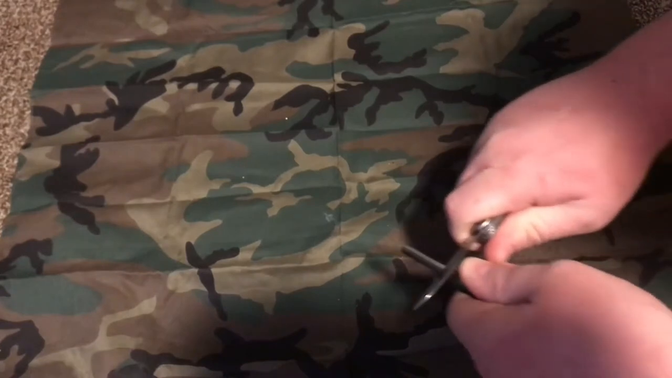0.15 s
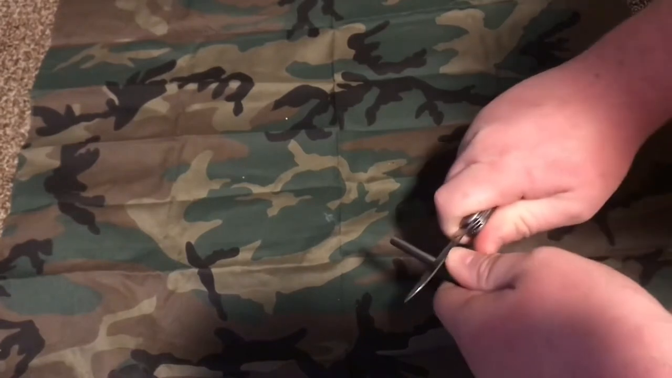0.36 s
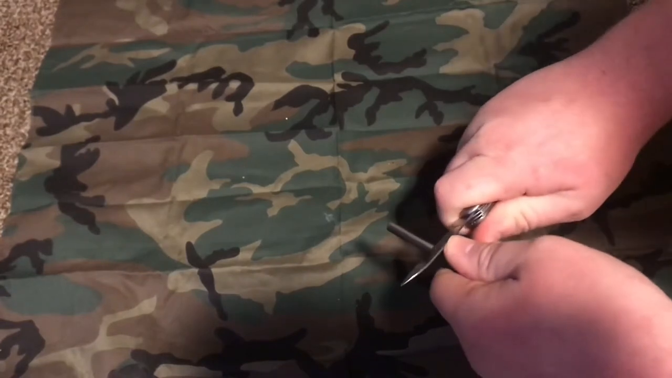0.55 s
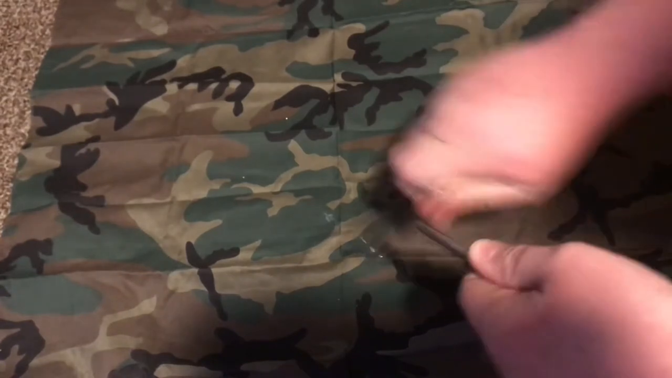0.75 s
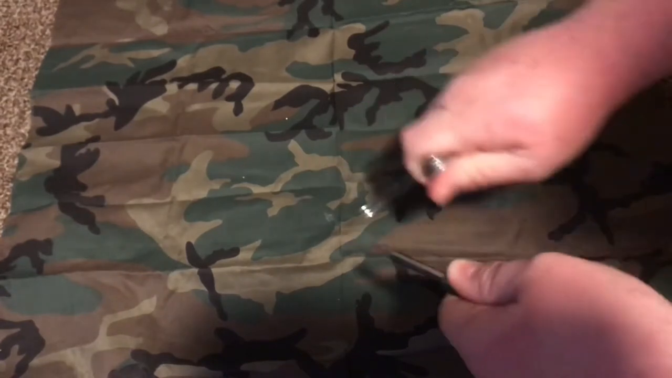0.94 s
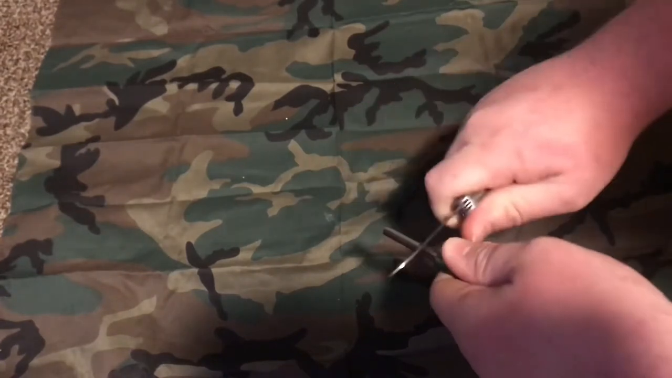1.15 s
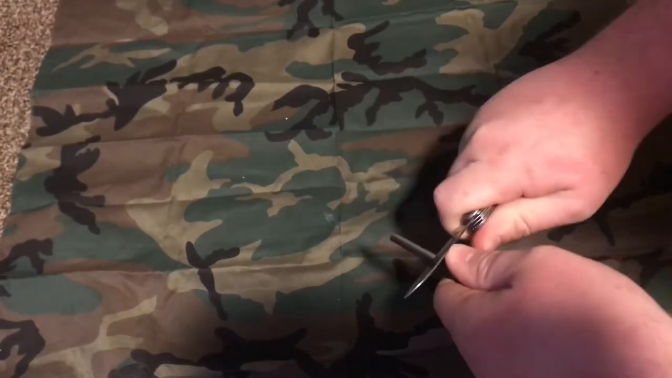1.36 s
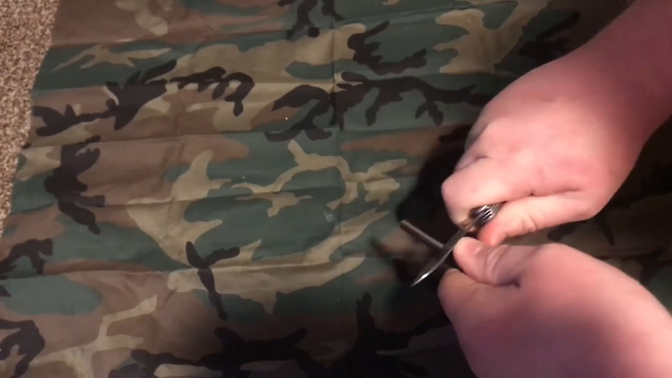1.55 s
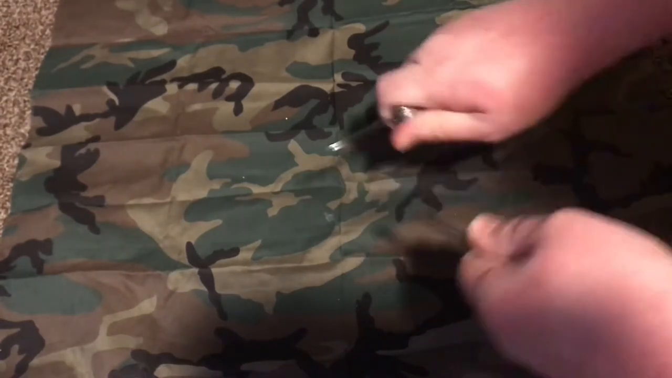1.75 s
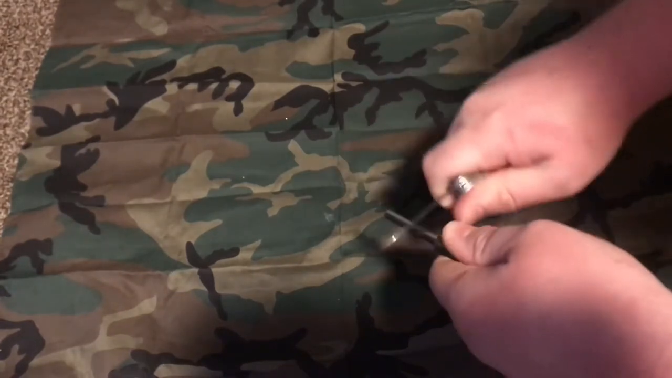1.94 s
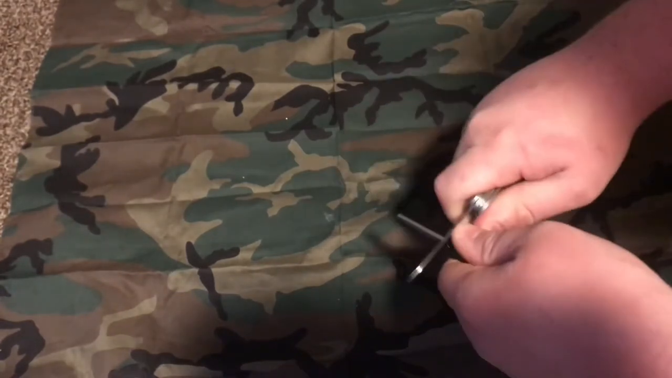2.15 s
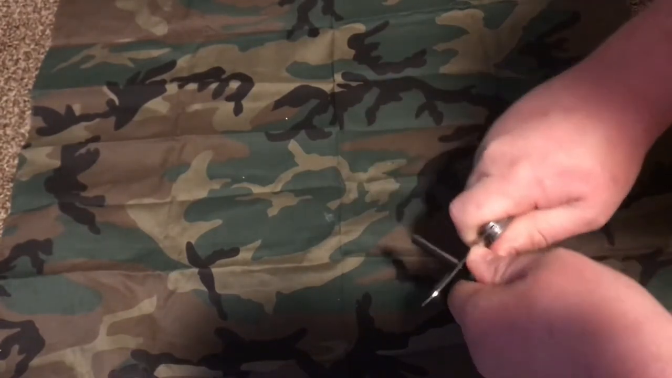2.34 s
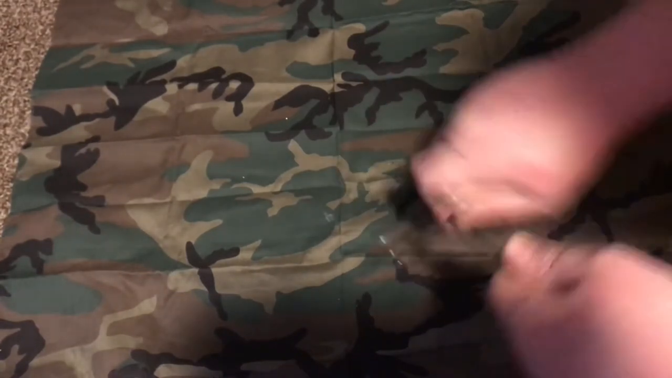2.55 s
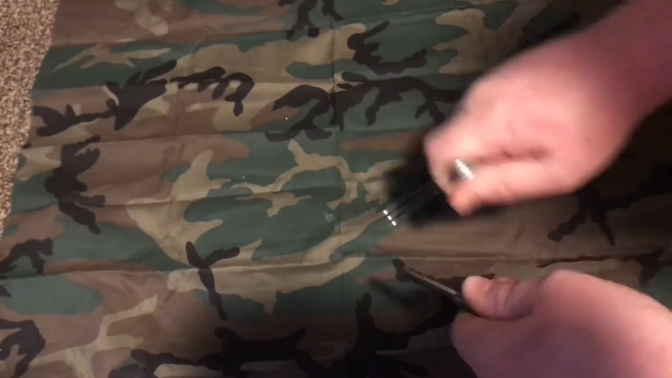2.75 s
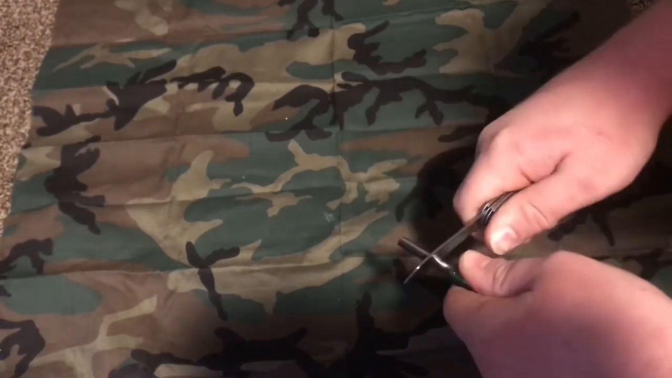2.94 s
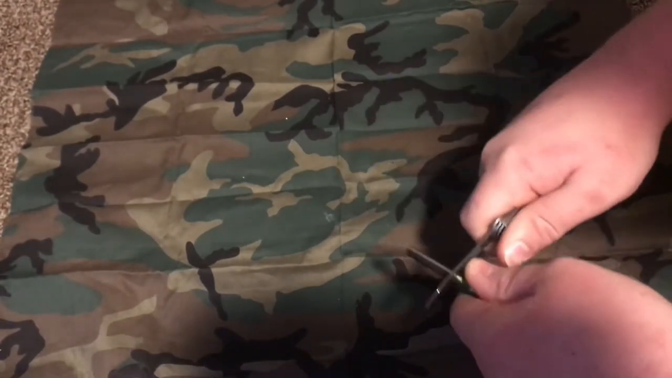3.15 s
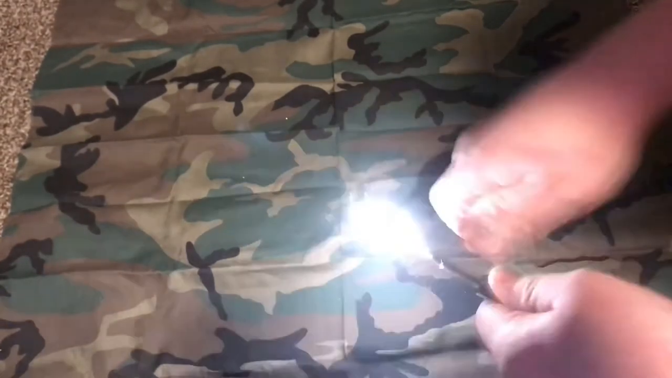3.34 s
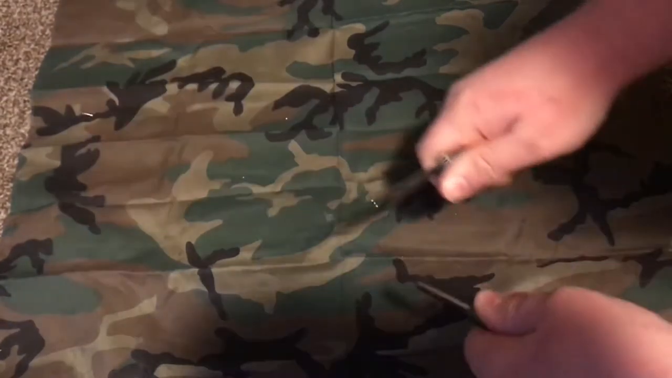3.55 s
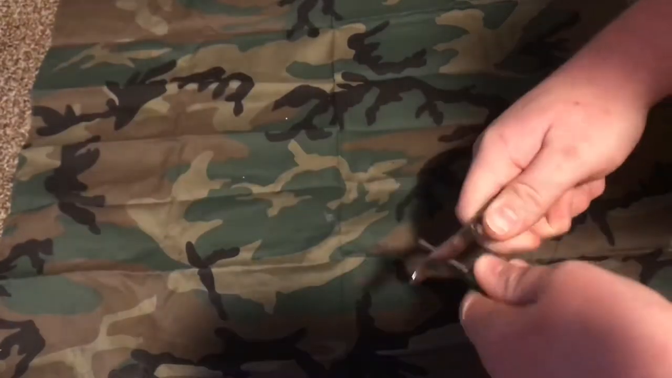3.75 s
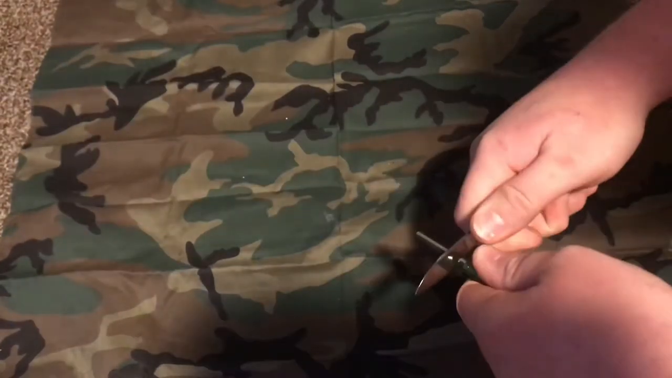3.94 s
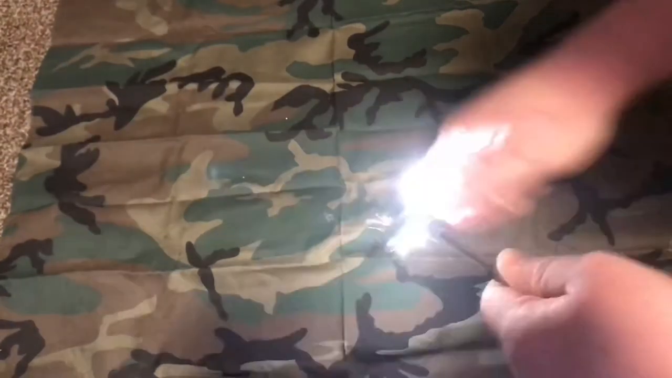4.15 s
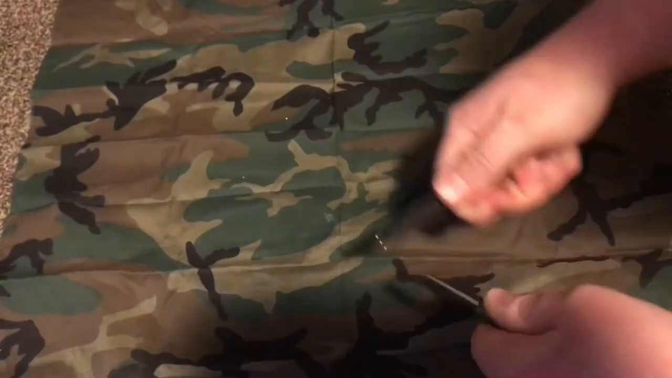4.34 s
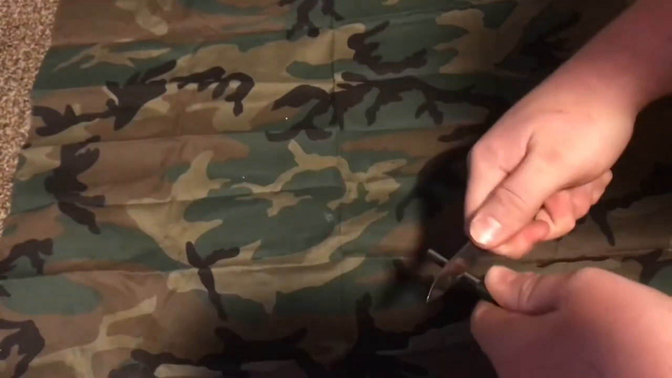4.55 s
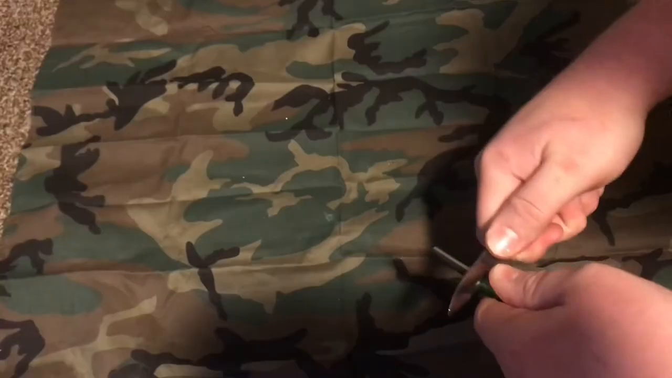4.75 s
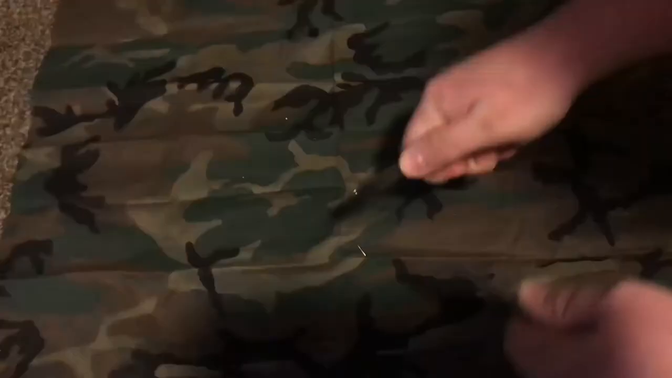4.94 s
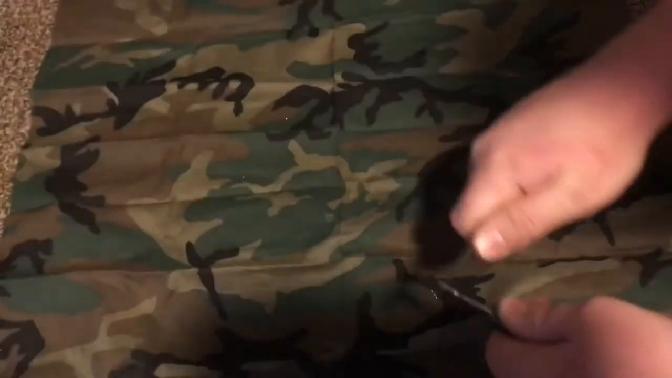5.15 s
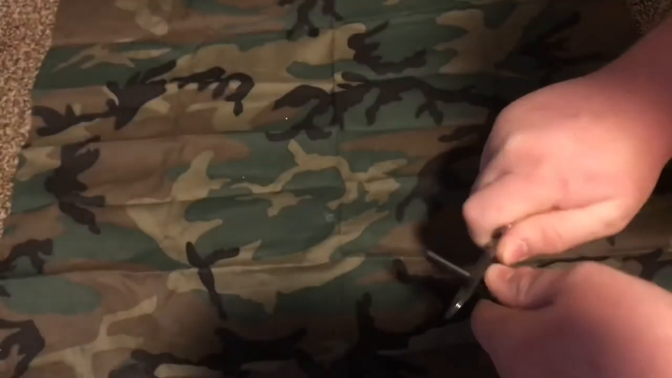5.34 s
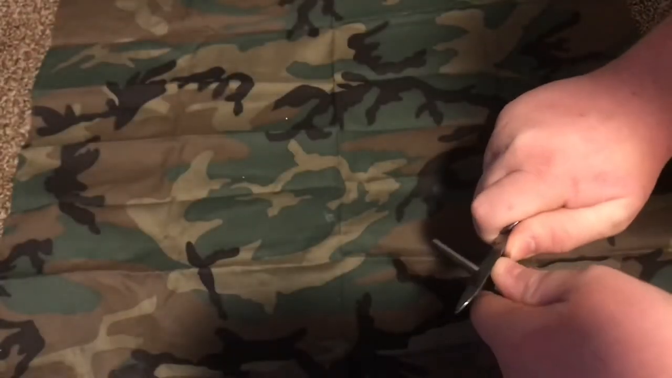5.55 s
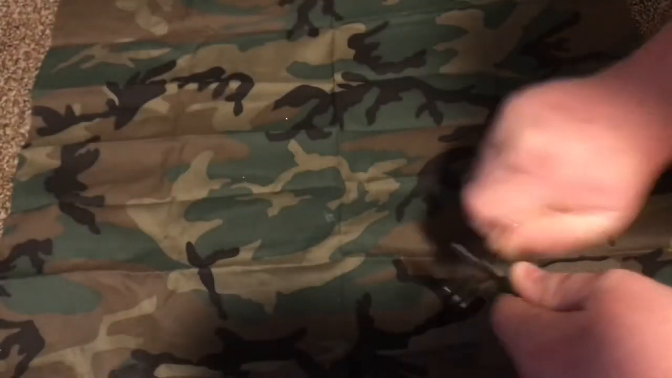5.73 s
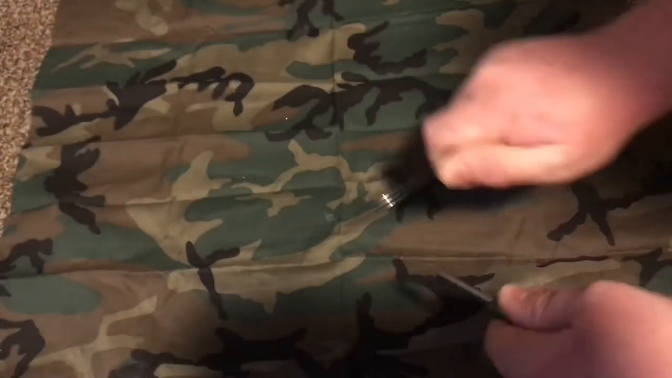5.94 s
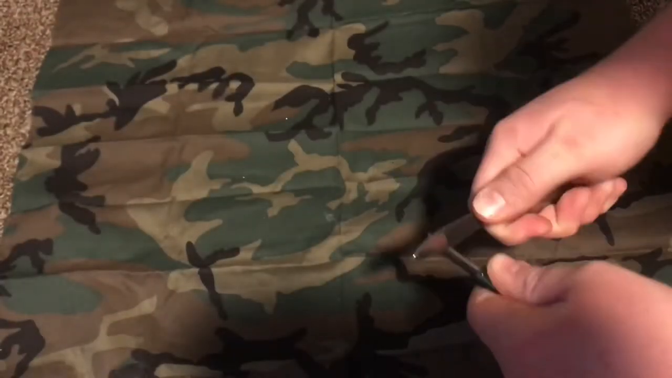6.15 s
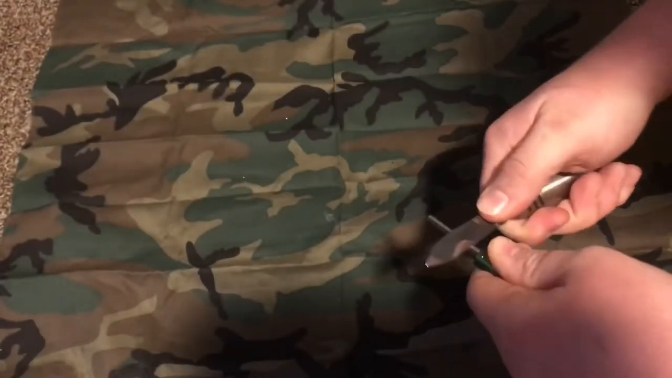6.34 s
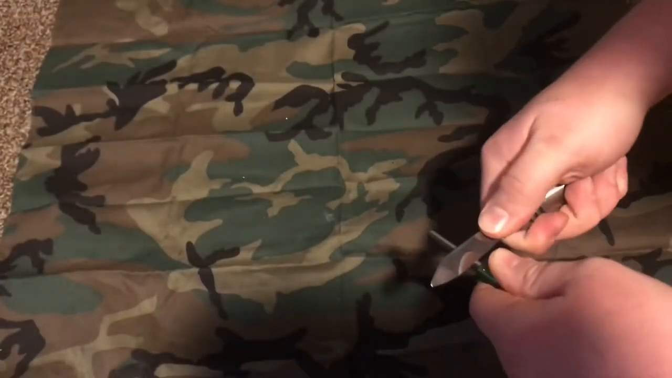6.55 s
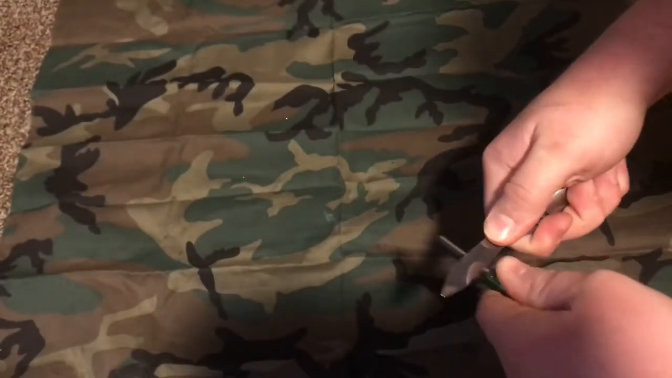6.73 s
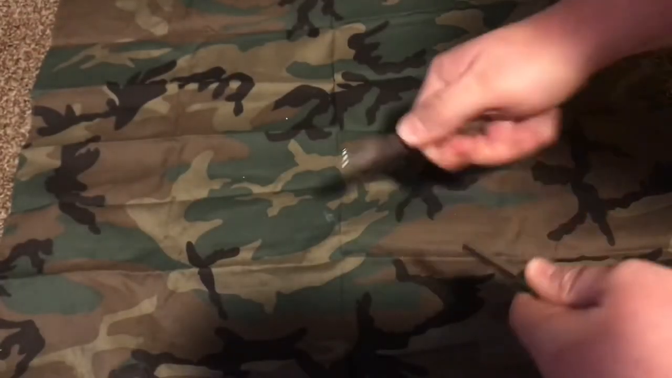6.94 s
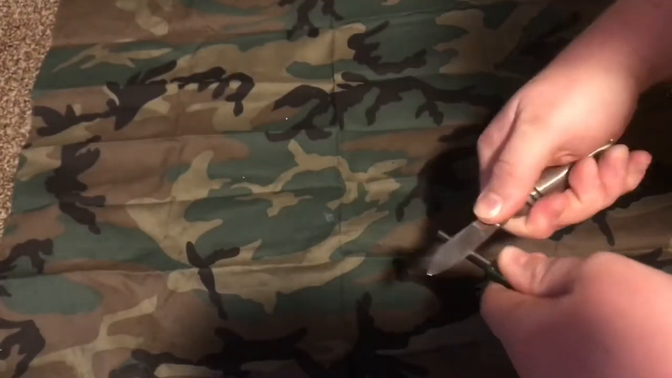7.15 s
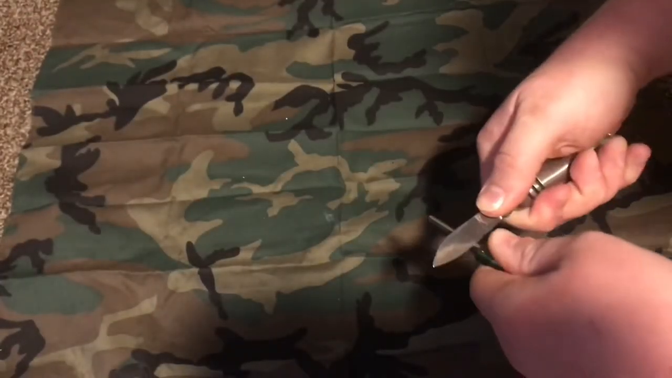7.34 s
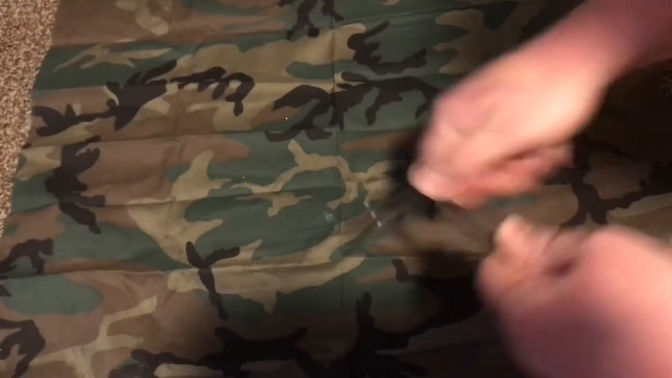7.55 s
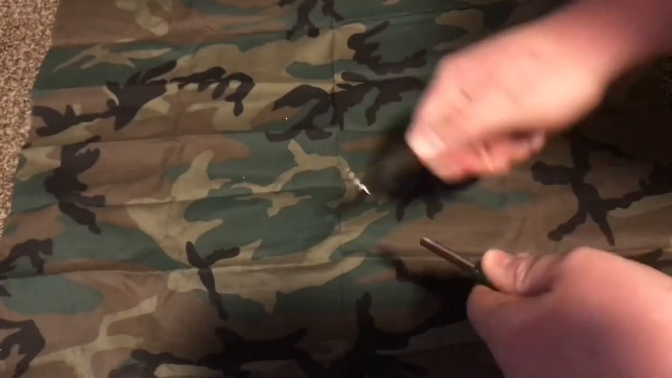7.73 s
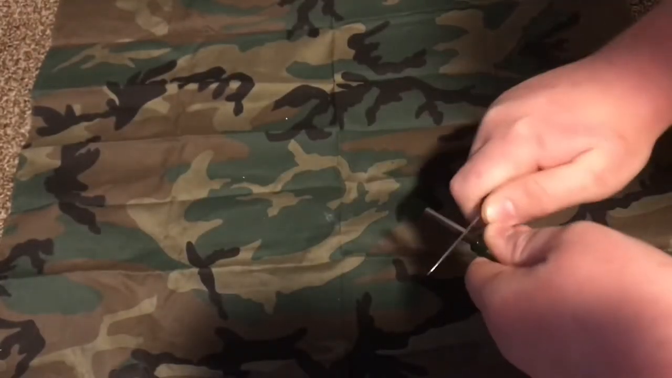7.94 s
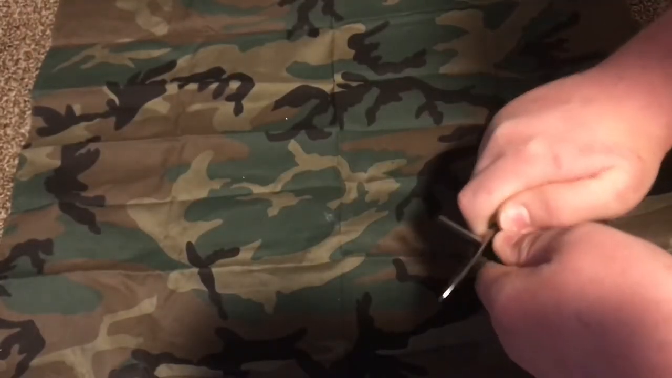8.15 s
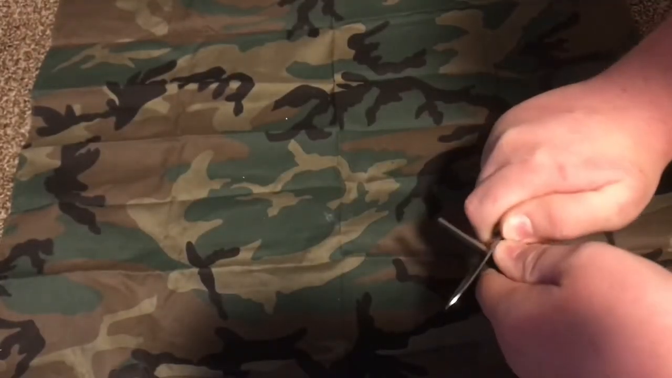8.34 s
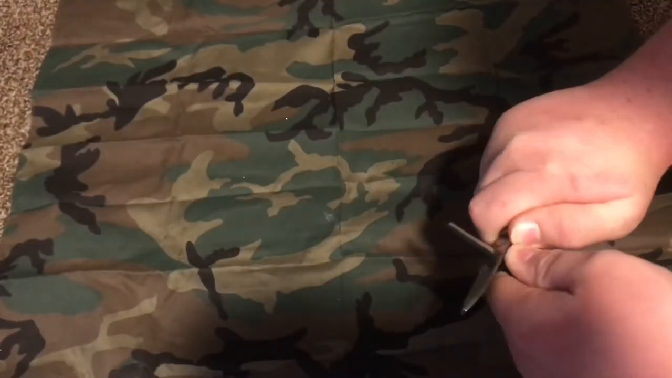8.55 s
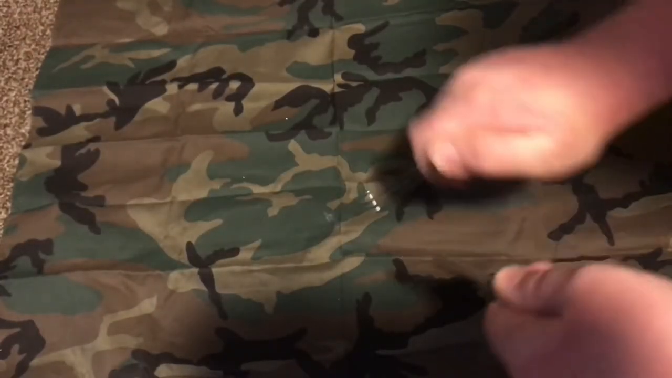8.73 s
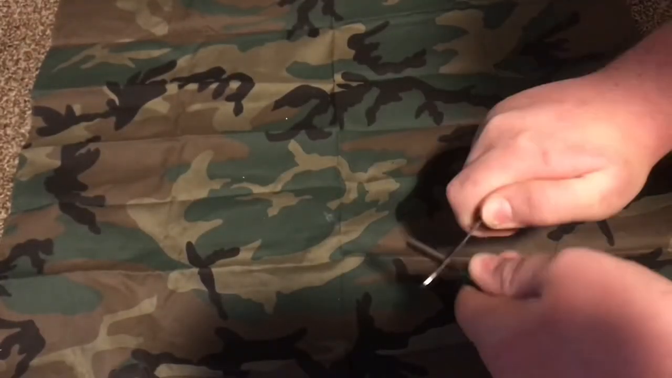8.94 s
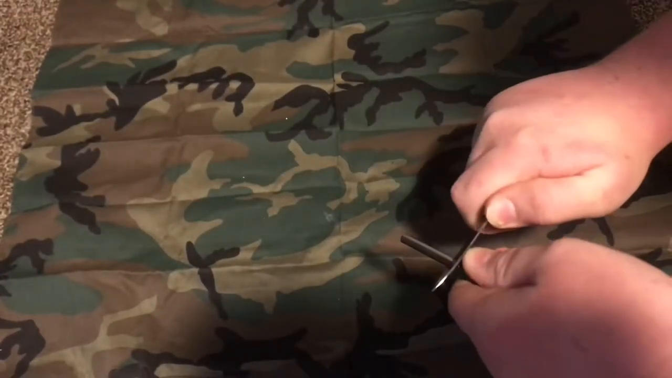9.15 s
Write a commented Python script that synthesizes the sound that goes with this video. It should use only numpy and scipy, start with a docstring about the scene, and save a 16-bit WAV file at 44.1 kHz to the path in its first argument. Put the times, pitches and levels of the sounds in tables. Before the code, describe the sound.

Ten quick, dry metallic rasps of a knife on a fire-starting rod, heard close up with a short room echo. Three softer strokes come first, then three sharp, loud ones, then four moderate to softer ones. Light landing ticks, brief skids and gritty rubs fill the gaps, and tiny flares puff and crackle after each stroke. The quiet room has low rumble, soft hiss, a faint drone and a thin electrical whine.

```python
"""A small quiet room: a knife is scraped ten times along a ferro rod, close to the microphone, over a cloth.
The edge bites in short rasps, dense fractures bunched by chatter, and snaps off the rod's end.
Around the strokes the blade lands with ticks, skids on and slides softly; shavings flare with a puff and a crackle.
Noisy contact forces pass through the resonances of blade and rod, which shift with the grip and the point of contact.
Behind them lie a short room echo, rumble and hiss, a low drone and a thin whine."""
import sys
import numpy as np
from scipy import signal
from scipy.fft import rfft, irfft
from scipy.io import wavfile

SR = 44100
rng = np.random.default_rng(int(sys.argv[2]) if len(sys.argv) > 2 else 0)


def to_wav(sig):
    """Store sig (one row per channel, or 1-D mono) as 16-bit WAV at the path in sys.argv[1].

    Samples outside -1..1 are clipped; the rate is SR.
    """
    pcm = np.clip(np.atleast_2d(sig), -1, 1) * 32767
    pcm = np.round(pcm).astype(np.int16)
    wavfile.write(sys.argv[1], SR, pcm.T)  # frames by channels


N = 409688
TIME = np.arange(N) / SR  # s
FILTER_HZ = np.maximum(np.fft.rfftfreq(2048, 1 / SR), 1)


def from_db(db):
    """Decibels to gain."""
    return 10 ** (np.asarray(db) / 20)


def rms_one(x):
    """Scale to an rms of 1."""
    return x / np.sqrt(np.mean(x ** 2) + 1e-20)


def at_hz(points, hz, axis=1):
    """Read one column of a table along log frequency."""
    points = np.array(points)
    return np.interp(np.log(np.maximum(hz, 1)), np.log(points[:, 0]), points[:, axis])


def add(track, start_s, sound):
    """Mix a sound into the track."""
    i = max(int(round(start_s * SR)), 0)
    track[i:i + len(sound)] += sound[:N - i]


def bell(hz, centre_hz, width_hz):
    """Shape of a resonance, 1 on top and one half at the edges of its width."""
    return 1 / (1 + (2 * (hz - centre_hz) / width_hz) ** 2)


def background():
    """Soft rumble and hiss, a low drone and a thin whine: shaped noise and steady sines."""
    # still room, spectrum shape: hz, density_db (relative, per Hz)
    still_room = [(15, -36), (25, -12.5), (59, -4), (111, -15), (180, -13.5), (200, -18.5), (427, -21),
                  (734, -31), (962, -28.5), (1740, -31.5), (3080, -34), (3520, -33), (4140, -34.5),
                  (9000, -39), (14400, -39), (16000, -44)]
    # low drone in the room: centre_hz, width_hz, level_db
    drone = [(54, 11, -70), (138.3, 4.4, -71.5)]
    # faint electrical whine: tone_hz, level_db
    whine = [(1000, -83.5), (2000, -85.5), (3001, -83.5), (4001, -83.5), (5001, -91), (6002, -84.5),
             (7003, -93), (8004, -92.5), (9005, -94)]
    still_room_db = -60.5
    hz = np.fft.rfftfreq(N, 1 / SR)
    spectrum = rfft(rng.standard_normal(N)) * from_db(at_hz(still_room, hz))
    out = from_db(still_room_db) * rms_one(irfft(spectrum, N))
    for centre_hz, width_hz, level_db in drone:
        spectrum = rfft(rng.standard_normal(N)) * bell(hz, centre_hz, width_hz)
        out += from_db(level_db) * rms_one(irfft(spectrum, N))
    for tone_hz, level_db in whine:
        phase_turns = rng.random()
        out += from_db(level_db) * np.sqrt(2) * np.sin(2 * np.pi * (tone_hz * TIME + phase_turns))
    return out


def handling(end_s, level_db, top_hz):
    """A soft low rumble, band-limited noise, as the hands settle into position."""
    band = signal.butter(2, [35, top_hz], "band", fs=SR, output="sos")
    rumble = signal.sosfilt(band, rng.standard_normal(N))
    fade_out = np.clip((end_s - TIME) / .1, 0, 1)
    return from_db(level_db) * rms_one(rumble) * fade_out


def through(force, response_db):
    """Pass a force through a causal (minimum-phase) body that keeps its energy."""
    cepstrum = irfft(np.log(from_db(response_db)))
    half = len(cepstrum) // 2
    # fold the cepstrum forward in time, so the body rings only after the force
    cepstrum[1:half] *= 2
    cepstrum[half + 1:] = 0
    impulse = irfft(np.exp(rfft(cepstrum)))[:half]
    return signal.fftconvolve(force, impulse / np.linalg.norm(impulse))


def grains(size, per_s, spread_db):
    """Tiny fractures at random moments, of uneven size; rms 1."""
    born = rng.random(size) < per_s / SR
    sizes = from_db(spread_db * np.minimum(rng.exponential(1, size), 4))
    return rms_one(born * sizes * rng.choice([-1, 1], size))


def hump(hz, centre_hz, width_hz):
    """A pair of close, damped modes merges into one round-topped hump, 1 on top."""
    return 1 / (1 + np.abs(2 * (hz - centre_hz) / width_hz) ** 3)


def blade(force, ring, detune=1, lightness=0):
    """Blade and rod pressed together: three hand-damped humps and the knife's own modes stand out of a steel hiss."""
    # steel on the rod, without its modes: hz, level_db (relative)
    steel = [(100, -34.5), (500, -21.5), (900, -11), (1300, -12), (1700, -3), (2900, -2.5), (3400, 3),
             (6000, 3.5), (7300, -2.5), (8600, -2.5), (10500, -1.5), (15000, -1), (16000, -13.5)]
    # modes of the knife that stay put whatever the grip: hz, width_hz, lift_db
    knife_modes = [(963, 47, 2), (2160, 56, 3.5), (2600, 280, 4.5), (3050, 60, 3.5), (3290, 58, 4.5),
                   (4390, 200, 2), (4680, 76, 4.5), (6870, 46, 7.5), (7050, 98, 3.5), (8370, 250, 4),
                   (8950, 220, 5.5), (9600, 54, 6), (9900, 35, 7.5), (12000, 300, 3)]
    low_hz, low_db, main_hz, main_db, upper_hz, upper_db, treble_db, bass_db = ring
    gripped = low_db * hump(FILTER_HZ, low_hz * detune, width_hz=620)
    gripped += main_db * hump(FILTER_HZ, main_hz * detune, width_hz=1300)
    gripped += upper_db * hump(FILTER_HZ, upper_hz * detune, width_hz=1150)
    steady = sum(lift_db * bell(FILTER_HZ, hz, width_hz) for hz, width_hz, lift_db in knife_modes)
    # the thin edge sings under light pressure, up to 9.3 dB
    edge = lightness * 9.3 * bell(FILTER_HZ, 11000 * detune, width_hz=1100)
    treble = treble_db * np.clip(np.log2(FILTER_HZ / 5000), 0, 1)
    bass = bass_db * np.clip(2 * np.log2(1700 / FILTER_HZ), 0, 1)
    return through(force, at_hz(steel, FILTER_HZ) + gripped + steady + edge + treble + bass)


def ring_of(low_hz, low_db, main_hz, main_db, bright_db, bass_db):
    """The grip sets the two lower humps; a brighter contact lifts the upper hump and the treble together."""
    upper_hz, upper_db = 5760, 3 + 0.78 * bright_db
    return low_hz, low_db, main_hz, main_db, upper_hz, upper_db, bright_db, bass_db


def light_ring(main_db, bass_db, low_hz, low_db, main_hz, bright_db):
    """Ring of a tick or a rub: a grip that raises the low hump leaves more thud below it."""
    usual_low_hz, thud_db_per_octave = 1890, 31.5
    thud_db = thud_db_per_octave * np.log2(low_hz / usual_low_hz)
    return ring_of(low_hz, low_db, main_hz, main_db, bright_db, bass_db + thud_db)


def rub_ring(*grip):
    """Ring of a soft rub, its main hump lifted a little and its bass fuller."""
    return light_ring(6, 7, *grip)  # lift of the main hump dB, bass dB


def swell(crest, build_db, curve, ease_db):
    """Level along a pass, in dB against its crest: the hand bears down, then lets up."""
    along, crest = np.linspace(0, 1, 64), np.clip(crest, .05, .99)
    before = np.clip(1 - along / crest, 0, 1)
    after = np.clip((along - crest) / (1 - crest), 0, 1)
    return -build_db * before ** curve - ease_db * after


def pressure(start_s, end_s, levels_db, edge_s):
    """Time axis and force of one pass of the blade, with quick edges."""
    t = np.arange(max(int((end_s - start_s) * SR), 64)) / SR
    level_db = np.interp(t, np.linspace(0, t[-1], len(levels_db)), levels_db)
    edges = np.clip(np.minimum(t, t[-1] - t) / edge_s, 0, 1)
    return t, from_db(level_db) * edges


def flutter(t, rate_hz, depth_db):
    """Gain of an uneven hand pressure."""
    bumps = np.clip(rng.standard_normal(256), -1.7, 1.7)
    return from_db(depth_db * np.interp(t * rate_hz, np.arange(len(bumps)), bumps))


def scrape(force, ring, wander, count, damping_db=-30):
    """The contact point travels, so the modes shift a little from one stretch of the pass to the next."""
    place, out = np.linspace(0, count - 1, len(force)), 0
    shifts = rng.uniform(-1, 1, count)
    for k, detune in enumerate(1 + wander * shifts):
        # neighbouring stretches cross-fade
        stretch = force * np.clip(1 - np.abs(place - k), 0, 1)
        # pressing hard damps the thin edge
        lightness = 1 / (1 + np.std(stretch) * np.sqrt(count) / from_db(damping_db))
        out = out + blade(stretch, ring, detune, lightness)
    return out


def rub(length_s, levels_db, ring):
    """Under light pressure the edge only rubs over the rod's grit, easing on and off."""
    t, force = pressure(0, length_s, levels_db, edge_s=.008)
    force = force * flutter(t, rate_hz=200, depth_db=2.0)
    force = force * grains(len(t), per_s=7000, spread_db=2.0)
    return scrape(force, ring, wander=.015, count=4)


def slides():
    """The blade is drawn back into place with a soft, swelling rub."""
    # light slides that seat the blade: start_s, end_s, peak_db (of the force),
    # low_hz (low hump), low_db (its lift), bright_db
    light_slides = [(0.051, .105, -61.5, 2065, 12, -3), (0.71, 0.747, -66, 2000, 19, -3),
                    (1.301, 1.383, -55.5, 1870, 10, -5), (3.016, 3.056, -56, 2006, 11, -2),
                    (3.114, 3.182, -45, 1930, 15, 0.5), (3.381, 3.406, -54, 2000, 14, 3.5),
                    (4.687, 4.785, -44, 2070, 12, -5), (5.373, 5.464, -52, 1873, 10, -1.5),
                    (6.334, 6.461, -52, 2120, 9, -1), (7.279, 7.325, -52.5, 2200, 14.5, 1.5),
                    (8.132, 8.223, -51, 1752, 17.5, -0.5), (8.379, 8.408, -50, 1855, 11, -4.5)]
    out, main_hz = np.zeros(N), 3900
    shape_db = swell(crest=.7, build_db=9.5, curve=1.3, ease_db=7)
    for start_s, end_s, peak_db, low_hz, low_db, bright_db in light_slides:
        ring = rub_ring(low_hz, low_db, main_hz, bright_db)
        add(out, start_s, rub(end_s - start_s, peak_db + shape_db, ring))
    return out


def stick_slip(t, rate_hz, jitter, fall):
    """The edge catches and lets go, nearly regularly; each slip starts hard and fades."""
    turns = np.cumsum(1 + jitter * rng.standard_normal(len(t))) * rate_hz / SR
    return np.exp(-fall * (np.abs(turns) % 1))


def touch(level_db, ring, length_s=0.0074, fade_s=0.0022, rise_s=0.0016, trim_db=-4.5):
    """A touch is a gritty burst of a few milliseconds; the grip stops the ringing at once."""
    t = np.arange(int(length_s * SR)) / SR
    burst = (1 - np.exp(-t / rise_s)) * np.exp(-t / fade_s)
    force = rms_one(burst * grains(len(t), per_s=20000, spread_db=3.5))
    return from_db(level_db + trim_db) * blade(force, ring)


def strokes():
    """The edge tears shavings off the rod: dense fractures, bunched by chatter, and a snap as it leaves the end."""
    # hard strokes: start_s, end_s, peak_db (before the trim), build_db, crest (share of the stroke),
    # chatter (0-1), snap_db (before the touch's trim), low_hz (low hump), low_db (its lift),
    # main_hz (main hump), main_db (its lift in the stroke), bright_db
    hard_strokes = [(0.749, 0.8205, -39, 29, 0.99, 0.1, -29, 1950, 18, 3870, 13.5, 5),
                    (1.656, 1.712, -36, 22.5, 1, 0.45, -24, 1830, 16, 3850, 13, 4),
                    (2.562, 2.618, -39, 13.5, 0.99, .36, -27, 1980, 11.5, 3670, 10, 2),
                    (3.403, 3.4395, -10.5, 2.5, 0.21, 0.48, -22, 2000, 21, 3990, 15.5, 11),
                    (4.189, 4.228, -12.5, 11, 0.51, .3, -10, 1694, 12, 3720, 11, 3.5),
                    (4.899, 4.947, -14.5, 21.5, 0.83, 0.07, -25, 1640, 11.5, 3590, 17.5, 4.5),
                    (5.801, 5.855, -28.5, 28.5, 0.74, 0.36, -42, 1817, 20, 3700, 12.5, 0.5),
                    (6.871, 6.906, -21.5, 20.5, 0.83, 0.17, -16, 1570, 14.5, 3940, 14, 1.5),
                    (7.578, 7.62, -20.5, 24, 0.92, .32, -19, 1615, 15.5, 4220, 9, -0.5),
                    (8.629, 8.685, -35.5, 23, .7, 0.55, -27, 2026, 20.5, 4100, -0.5, -3.5)]
    trim_db = -1.0
    # strokes below the full level are fuller in the bass
    full_stroke_db, bass_per_db = -17, 0.58
    # the snap starts just before the rasp ends and rings less (share of the humps' lift)
    snap_lead_s, snap_share = .003, .65
    out = np.zeros(N)
    for (start_s, end_s, peak_db, build_db, crest, chatter, snap_db,
         low_hz, low_db, main_hz, main_db, bright_db) in hard_strokes:
        bass_db = bass_per_db * (full_stroke_db - peak_db)
        levels_db = peak_db + swell(crest, build_db, curve=1.5, ease_db=1.5)
        t, force = pressure(start_s, end_s, levels_db, edge_s=0.00028)
        slips = stick_slip(t, rate_hz=208, jitter=1.2, fall=1.9)
        force = force * rms_one(1 - chatter + 2 * chatter * slips)
        force = force * grains(len(t), per_s=9000, spread_db=2.0)
        ring = ring_of(low_hz, low_db, main_hz, main_db, bright_db, bass_db)
        add(out, start_s, from_db(trim_db) * scrape(force, ring, wander=0.01, count=7))
        snap_ring = ring_of(low_hz, snap_share * low_db, main_hz, snap_share * main_db, bright_db, bass_db)
        add(out, end_s - snap_lead_s, touch(snap_db, snap_ring))
    return out


def flares():
    """Burning shavings push out a soft puff of air, and the sparks crackle."""
    # shavings catch fire: peak_s (height of the flare), puff_db, crackle_db
    burning_shavings = [(.829, -55, -45.5), (1.718, -46.5, -44), (2.622, -48.5, -45), (3.45, -43.5, -26.5),
                        (4.255, -45, -27.5), (4.97, -46, -28), (5.858, -48, -39.5), (6.912, -50, -54),
                        (7.622, -44.5, -48.5), (8.689, -48.5, -42.5)]
    # spectrum of the flame's puff: hz, level_db (relative)
    puff_spectrum = [(50, -14), (110, -5), (200, 0), (330, -3), (500, -9.5), (700, -7.5), (1200, -6),
                     (2500, -28.5), (8000, -54)]
    # spectrum of the sparks' crackle: hz, level_db (relative)
    crackle_spectrum = [(200, -27), (1000, -17.5), (2000, 3.5), (4500, 1), (7000, -1), (15000, -0.5)]
    half_s = .01
    out, t = np.zeros(N), np.arange(-2 * half_s, 2 * half_s, 1 / SR)
    flame = np.exp(-(t / half_s) ** 2)
    for peak_s, puff_db, crackle_db in burning_shavings:
        puff = through(flame * rng.standard_normal(len(t)), at_hz(puff_spectrum, FILTER_HZ))
        sparks = flame * grains(len(t), per_s=5400, spread_db=1.5)
        crackle = through(sparks, at_hz(crackle_spectrum, FILTER_HZ))
        add(out, peak_s + t[0], from_db(puff_db) * puff + from_db(crackle_db) * crackle)
    return out


def ticks():
    """The blade lands or catches on the rod with a tick and may skid on, fading as the hand brakes it."""
    # contacts: start_s, level_db (before the touch's trim), skid_s (0 for none), skid_db (force at its start),
    # then the grip: low_hz (low hump), low_db (its lift), main_hz (main hump), bright_db
    contacts = [(1.163, -32, .08, -47.5, 1920, 9, 4760, 4.5),
                (2.0249, -26.5, 0.13, -44.5, 1890, 10, 4870, 2),
                (2.268, -55, 0.0074, -70, 1950, 11, 4200, 0),
                (2.4747, -50.5, 0.023, -68, 2047, 15, 4460, 19), (2.5257, -52, 0, -70, 1950, 11, 3100, -8),
                (2.988, -35.5, .018, -64, 1600, 11.5, 3840, -3.5),
                (3.1794, -33.5, 0, -72, 1950, -1, 4680, 4.5), (3.4053, -13, 0, -70, 1980, 14, 3960, 9),
                (3.845, -58, 0, -70, 2000, 4.5, 4600, 7), (3.887, -30.5, 0, -72, 2050, 7, 4400, 7),
                (3.8923, -34.5, 0, -70, 2065, 8, 3040, 1), (4.542, -50, 0.052, -53.5, 1955, 16, 3570, -5),
                (4.935, -13.5, 0, -70.5, 1627, 6, 3640, 0), (5.262, -33, 0.124, -47, 1898, 5.5, 3500, 0),
                (6.311, -47, 0.027, -59, 2194, 13.5, 3503, -0.5),
                (6.5523, -49, 0.0079, -69.5, 1798, 12, 3990, 0), (6.898, -21, 0, -70, 1603, 9, 4000, 0.5),
                (7.2012, -36.5, 0.045, -48, 2150, 13.5, 3907, 0.5),
                (7.5903, -31.5, 0, -70, 1870, 12.5, 4700, 2),
                (7.604, -19, 0.0038, -70, 1700, 12, 4320, 1.5),
                (7.9514, -29, .069, -46, 1717, 14.5, 3830, 3.5),
                (8.0357, -52, 0.0048, -71, 1816, 25, 3915, -13),
                (9.0499, -28.5, 0.075, -53, 1658, 12, 3940, 7.5)]
    fade_db_per_s = 150
    out = np.zeros(N)
    for start_s, level_db, skid_s, skid_db, *grip in contacts:
        tick_ring = light_ring(9.1, 4.9, *grip)  # lift of the main hump dB, bass dB
        add(out, start_s, touch(level_db, tick_ring))
        if skid_s > 0:
            levels_db = [skid_db, skid_db - fade_db_per_s * skid_s]
            add(out, start_s, rub(skid_s, levels_db, rub_ring(*grip)))
    return out


def room(x, first_echo_s, late_db, late_t60):
    """Dense reflections die band by band, with a faint longer tail behind them."""
    # room echo: hz, t60_s, level_db (against the direct sound)
    echo_bands = [(250, 0.27, -8.5), (900, 0.23, -14.5), (1999, 0.2, -13), (4300, 0.16, -15),
                  (8000, .23, -19.5), (14000, 0.17, -18.5)]
    t = np.arange(int(.8 * SR)) / SR
    edges_hz = np.geomspace(100, 17000, 12)
    echo = np.zeros(len(t))
    for low_hz, high_hz in zip(edges_hz, edges_hz[1:]):
        hz = np.sqrt(low_hz * high_hz)
        decay = from_db(-60 * t / at_hz(echo_bands, hz)) + from_db(late_db - 60 * t / late_t60)
        # silent until the first echo, at full level after twice that time
        decay = decay * np.clip(t / first_echo_s - 1, 0, 1)
        tail = rng.standard_normal(len(t)) * decay / np.linalg.norm(decay)
        band = signal.butter(2, [low_hz, high_hz], "band", fs=SR, output="sos")
        echo += from_db(at_hz(echo_bands, hz, axis=2)) * signal.sosfilt(band, tail)
    return signal.fftconvolve(x, echo)[:N]


def scene():
    """Knife, rod and sparks close to the microphone, the room behind them."""
    still = background() + handling(end_s=0.406, level_db=-57.0, top_hz=97)
    close = slides() + strokes() + flares() + ticks()
    echo = room(close, first_echo_s=0.0041, late_db=-37.5, late_t60=.7)
    return (close + echo + still)[None]


def record(dry):
    """The deepest bass is cut, the highest peaks are rounded and the top is cut."""
    low_cut = signal.butter(4, 36, "high", fs=SR, output="sos")
    top_cut = signal.cheby2(12, 70, 17000, fs=SR, output="sos")  # 70 dB down from 17 kHz
    dry = signal.sosfilt(low_cut, dry)
    rounded = dry / (1 + (dry / .76) ** 8) ** .125  # peaks bend towards 0.76
    return signal.sosfilt(top_cut, rounded)


dry = scene()
out = record(dry)
to_wav(out)
```